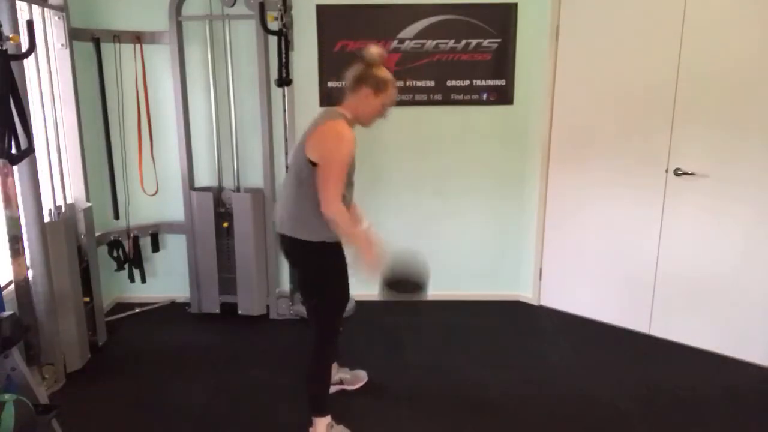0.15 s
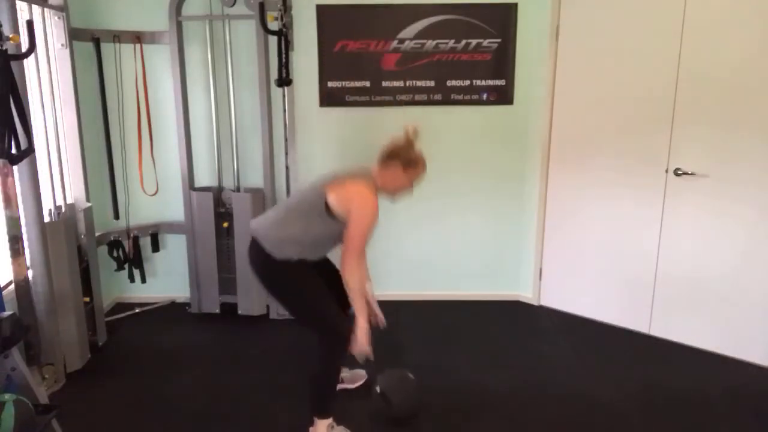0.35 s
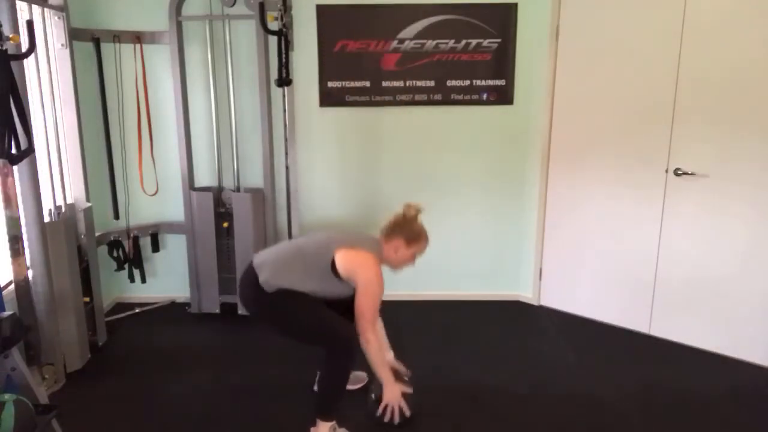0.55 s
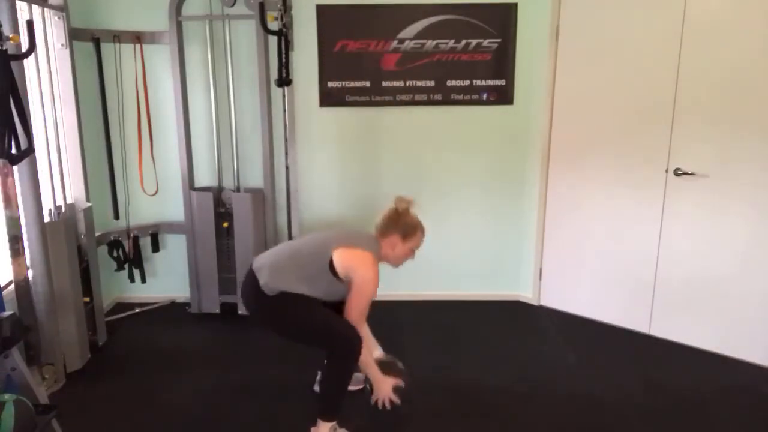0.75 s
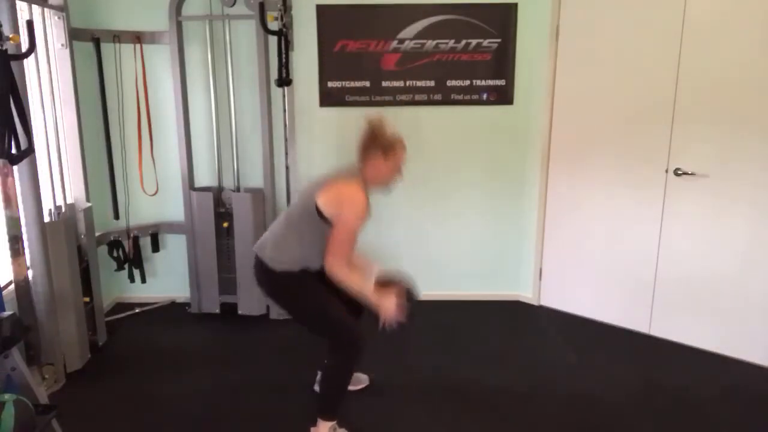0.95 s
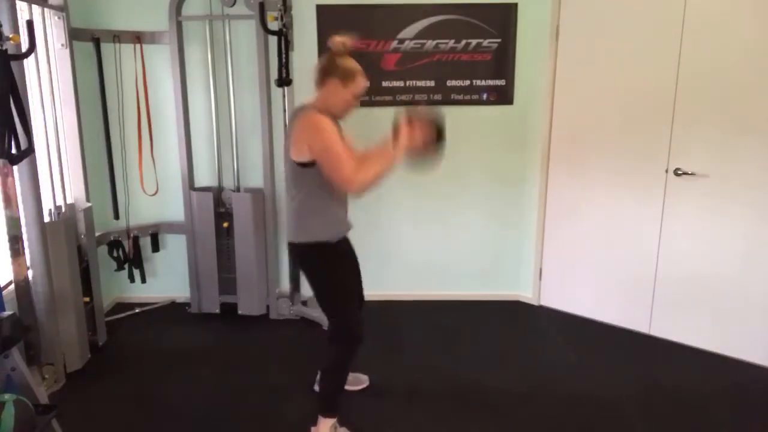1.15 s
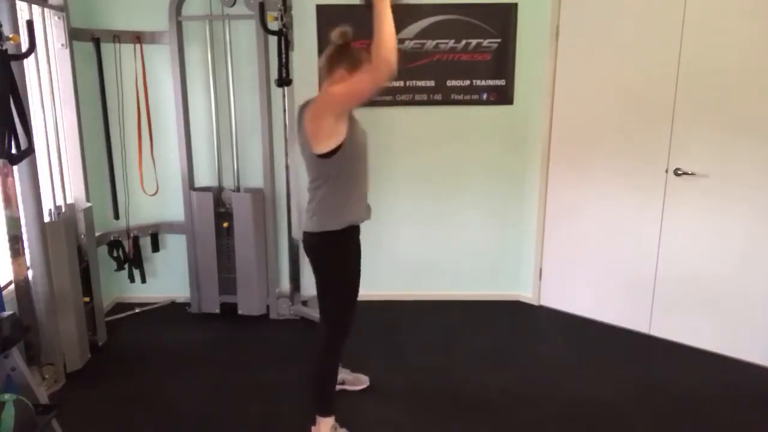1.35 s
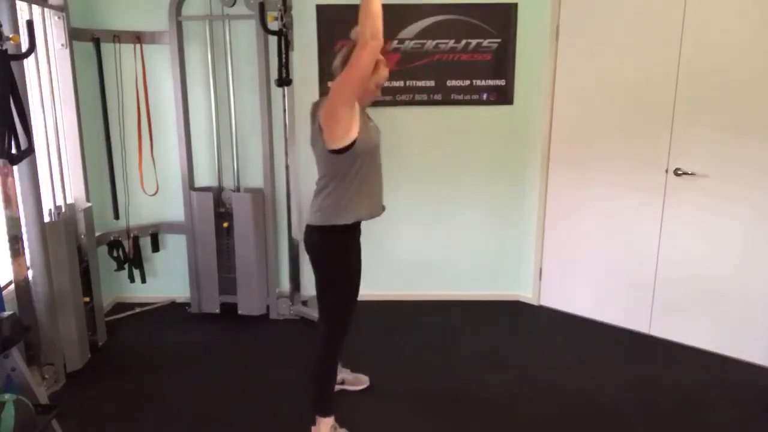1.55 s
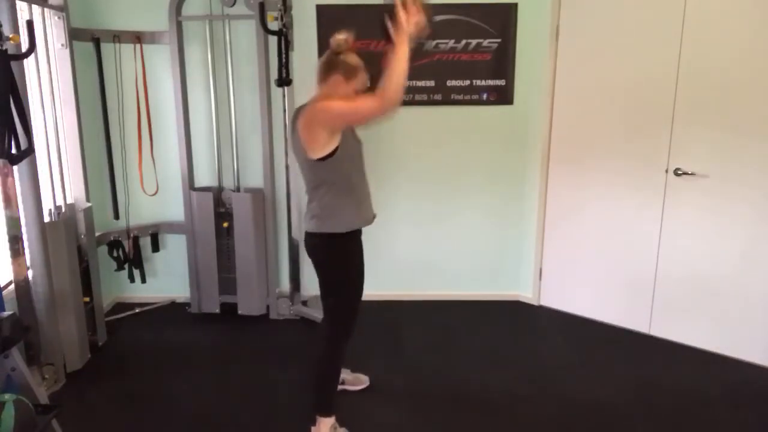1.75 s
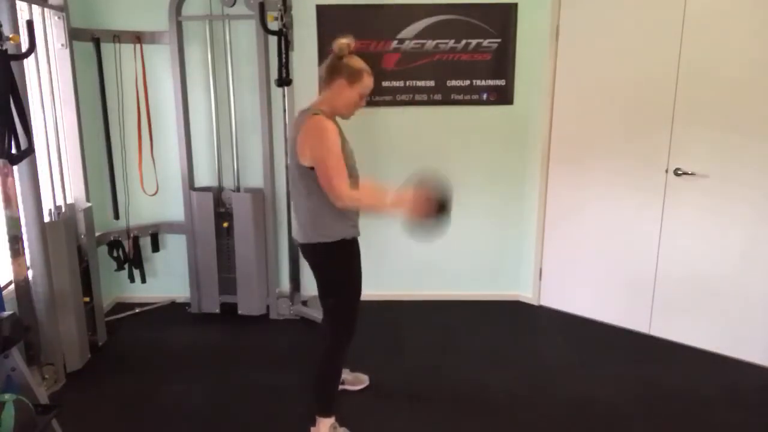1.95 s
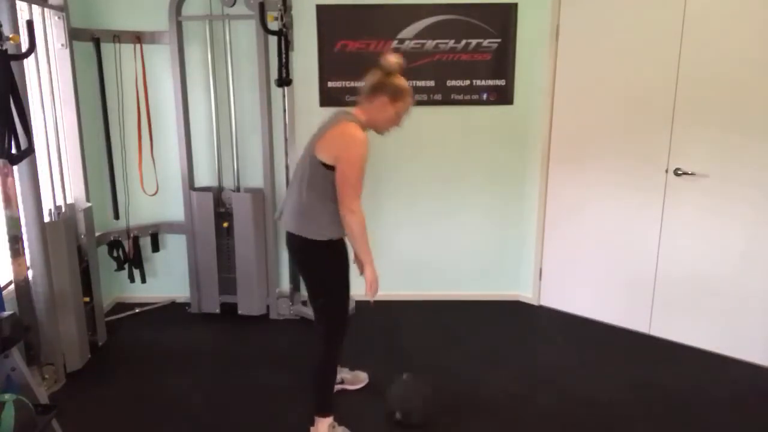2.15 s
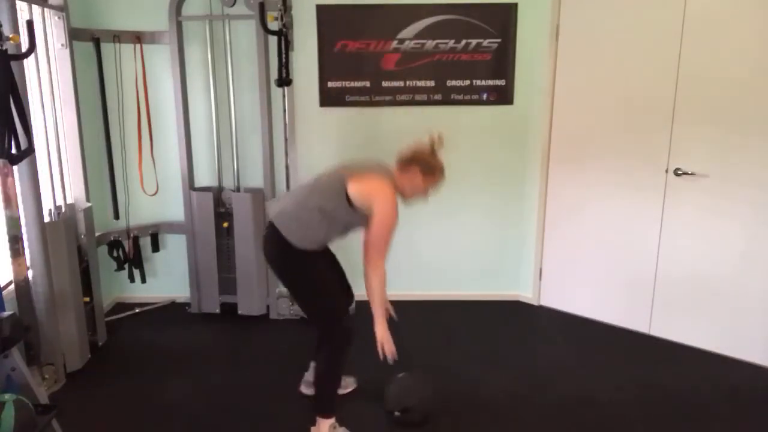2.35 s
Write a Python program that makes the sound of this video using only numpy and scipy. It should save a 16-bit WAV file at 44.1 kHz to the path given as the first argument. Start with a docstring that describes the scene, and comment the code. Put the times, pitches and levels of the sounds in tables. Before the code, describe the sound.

A heavy ball slams onto a matted gym floor at about 0.25 seconds, just after a quick cloth swish: a sharp crack and bright slap, quick wall echoes and a booming half-second tail. A soft padded contact comes near 0.6, a very faint swish near 1.1. Another swish at 2.0 leads to a lower, thuddier slam at 2.12, then a faint pat at 2.35. Low hum and hiss continue throughout.

```python
"""A faint steady hum and hiss, then arms and clothes swish close by: someone slams a heavy rubber ball.
Two throws hit the matted floor of a small, live gym; a fainter swish passes between them.
Each slam sums short damped tones for crack, slap, thump and thud, discrete wall echoes, ringing modes
and decaying noise for the room; shaped noise makes the swishes and the soft contact after each slam."""
import sys
import numpy as np
from scipy import signal
from scipy.fft import rfft, irfft
from scipy.io import wavfile

SR = 44100
rng = np.random.default_rng(int(sys.argv[2]) if len(sys.argv) > 2 else 0)


def wav_out(sig):
    """Save sig, one row per channel (or a flat mono array), as 16-bit PCM at SR to the path in sys.argv[1]."""
    wavfile.write(sys.argv[1], SR, np.round(np.clip(np.atleast_2d(sig).T, -1, 1) * 32767).astype(np.int16))


N = 110250
T = np.arange(N) / SR  # time in seconds


def undb(db):
    """Decibels to amplitude gain."""
    return 10 ** (np.asarray(db) / 20)


def read(table, hz):
    """A table's value, interpolated on a log-frequency axis."""
    table_hz, value = np.array(table, float).T
    return np.interp(np.log(np.maximum(hz, 1)), np.log(table_hz), value)


def noise(colour):
    """Random-phase noise with the given spectrum in dB per Hz, scaled to rms 1."""
    hz = np.fft.rfftfreq(N, 1 / SR)
    random_phase = np.exp(2j * np.pi * rng.random(len(hz)))
    x = irfft(undb(read(colour, hz)) * random_phase, N)
    return x / x.std()


def room_tone():
    """Faint steady hiss of shaped noise over a low hum of pure tones."""
    # Steady hum. Each row: frequency in Hz, rms level in dB.
    hum_tones = [(62, -78.5), (301, -81)]
    # Spectrum of the hiss. Each row: frequency in Hz, relative level in dB per Hz.
    air_colour = [(15, -60.5), (25, -26), (59, -4), (92, -5.5), (130, -5), (266, -6), (301, -5), (492, -10),
                  (530, -8.5), (826, -11), (1350, -14), (5780, -20.5), (9000, -26), (11700, -58.5),
                  (19800, -120)]
    air_db = -68.5
    hum = sum(undb(db) * np.sqrt(2) * np.sin(2 * np.pi * hz * T) for hz, db in hum_tones)
    return undb(air_db) * noise(air_colour) + hum


def fade(t, t60):
    """Exponential decay from t = 0, falling 60 dB in t60 seconds."""
    return (t >= 0) * np.exp(-np.log(1000) * np.maximum(t, 0) / t60)


def swish(at, width, hiss_db, flap_db):
    """Cloth rubs and flaps as the arms swing: noise swells to a peak and the room holds it briefly."""
    # Rubbing cloth. Each row: frequency in Hz, relative level in dB per Hz.
    rub_colour = [(200, -4), (900, -4.5), (1600, -1.5), (3000, 2), (5000, 1.5), (7500, 1), (9000, -4)]
    # Flapping cloth. Each row: frequency in Hz, relative level in dB per Hz.
    flap_colour = [(40, -12), (150, -8), (350, -0.5), (600, -9.5), (1000, -9), (2000, -20), (9000, -41)]
    room_t60_s = 0.45
    t = T - at
    swing = np.exp(-0.5 * (t / width) ** 2)
    swell = np.maximum(swing, fade(t, room_t60_s))
    cloth = undb(hiss_db) * noise(rub_colour) + undb(flap_db) * noise(flap_colour)
    return swell * cloth


def ring(t, hz, t60):
    """One damped vibration: a sine under an exponential decay."""
    return np.sin(2 * np.pi * hz * t) * fade(t, t60)


def modes(t, table):
    """A set of damped vibrations, each delayed by a random part of its own cycle."""
    return sum(undb(db) * ring(t - rng.random() / hz, hz, t60) for hz, db, t60 in table)


def reverberation(t, colour, shade=lambda hz: 0 * hz):
    """Dense reflections as noise: each octave band dies away at its own rate; shade adds dB."""
    # Decay of the gym. Each row: frequency in Hz, t60 in seconds.
    room_t60 = [(60, 0.87), (170, 0.34), (400, .55), (900, 0.56), (2000, 0.6), (4000, 0.54), (8000, 0.41)]
    hz = np.fft.rfftfreq(N, 1 / SR)
    spectrum = rfft(noise(colour)) * undb(shade(hz + 1))
    centres = 62.5 * 2. ** np.arange(8)  # octave centres in Hz
    out = 0
    for centre, pick in zip(centres, np.eye(len(centres))):
        # Neighbouring bands cross-fade and sum to the whole spectrum.
        weight = np.interp(np.log(hz + 1), np.log(centres), pick)
        band = irfft(spectrum * weight, N)
        out = out + band * fade(t, read(room_t60, centre))
    return out


def slam(at, db, slap_hz, slap_db, thump_db, room_db, tilt_db, bump_db, boom_hz, boom_db, thud_db):
    """Skin cracks, trapped air slaps, ball thumps and rings, floor thuds; walls answer, the room booms."""
    # First reflections off the walls. Each row: delay in seconds, gain in dB.
    walls = [(.0055, -15), (.0082, -4), (.0096, -3), (0.0126, -9), (.029, -13.5), (0.045, -11)]
    # Air ringing inside the ball. Each row: frequency in Hz, relative level in dB, t60 in seconds.
    ball_modes = [(1131, -34.5, .45), (1841, -37, .3), (2480, -36, .4), (3086, -45.5, .35),
                  (3398, -42.5, .35), (4165, -39, .3), (4519, -38.5, 0.19), (5626, -46, 0.47),
                  (6810, -49.5, .35)]
    # Ringing of the room. Each row: frequency in Hz, relative level in dB, t60 in seconds.
    room_modes = [(57.4, -45, 0.74), (117, -36, 0.42), (217.7, -35.5, 0.43), (262.3, -32.5, .45),
                  (347, -32, .5), (396.5, -34, .45), (470.6, -36, 0.47), (606.6, -34.5, .5)]
    # Reverberation before tilt and bump. Each row: frequency in Hz, relative level in dB per Hz.
    tail_colour = [(25, -27.5), (50, -10.5), (78, -15.5), (130, -8.5), (220, -3.5), (380, 3.5), (520, -4),
                   (700, -5.5), (1100, -7), (1800, -9.5), (2800, -12.5), (4400, -15.5), (5400, -19.5),
                   (7000, -23.5), (9000, -31)]
    crack_hz, crack_t60_s, crack_db = 3700, 0.0017, -4.5
    slap_t60_s, slap_octaves = 0.0055, 0.1  # the octaves set how narrow the slap's bump in the room is
    thump_hz, thump_t60_s = 385, 0.041
    thud_hz, thud_t60_s = 130, 0.098
    tail_db, early_db, early_t60_s = -22.5, -17.5, 0.1
    clump_s, clump_width_s, clump_db = 0.052, 0.016, 2.5
    build_s, boom_t60_s = 0.004, 0.58

    t = T - at
    crack = -undb(crack_db) * ring(t, crack_hz, crack_t60_s)
    slap = undb(slap_db) * ring(t, slap_hz, slap_t60_s)
    thump = undb(thump_db) * ring(t, thump_hz, thump_t60_s)
    blow = crack + slap + thump
    thud = undb(thud_db) * ring(t, thud_hz, thud_t60_s)
    echoes = sum(undb(gain_db) * np.interp(T - lag, T, blow, left=0) for lag, gain_db in walls)

    def shade(hz):
        """The tail's tilt about the slap's pitch and its bump there, in dB."""
        octaves = np.log2(hz / slap_hz)
        return tilt_db * octaves + bump_db * np.exp(-(octaves / slap_octaves) ** 2)

    tail = reverberation(t, tail_colour, shade)
    tail = tail * (undb(tail_db) + undb(early_db) * fade(t, early_t60_s))
    # Reflections from the far walls arrive together and lift the tail for a moment.
    tail = tail * undb(clump_db * np.exp(-((t - clump_s) / clump_width_s) ** 2))

    # One room mode booms according to where the ball lands.
    boom = undb(boom_db) * ring(t, boom_hz, boom_t60_s)
    ringing = modes(t, ball_modes) + modes(t, room_modes) + boom
    build = 1 - np.exp(-np.maximum(t, 0) / build_s)
    room = undb(room_db) * build * (tail + ringing)
    return undb(db) * (blow + thud + echoes + room)


def touch(at, db, rise):
    """A padded contact with the ball: noise rises softly and decays, with a short tail in the room."""
    # Spectrum of a soft contact. Each row: frequency in Hz, relative level in dB per Hz.
    pat_colour = [(40, -12), (120, 7.5), (300, 5), (700, 2), (1200, 0), (2200, -9.5), (4000, -16.5),
                  (7500, -16.5), (9000, -31.5)]
    pat_t60_s, room_db = 0.13, -1
    t = T - at
    pat = noise(pat_colour) * fade(np.maximum(t - rise, 0), pat_t60_s)
    room = undb(room_db) * reverberation(t, pat_colour)
    return undb(db) * np.clip(t / rise, 0, 1) * (pat + room)


def scene():
    """Two throws in the quiet gym."""
    # Swishes of moving clothes. Each row: peak time in seconds, width in seconds, hiss level in dB,
    # cloth flap level in dB.
    swishes = [(0.139, 0.034, -56, -67.5), (1.09, .06, -73, -80), (2.008, 0.038, -58, -58)]
    # Slams. Each row: start in seconds, level in dB, slap pitch in Hz, slap in dB, thump in dB,
    # room in dB, treble tilt in dB per octave, slap in the room in dB, boom pitch in Hz, boom in dB,
    # floor thud in dB. The slam's level scales all its parts; the room's also scales the boom.
    slams = [(0.2483, -1.5, 1380, -3.5, -19.5, 1.28, -0.28, 2.5, 416, -32.5, -33.5),
             (2.1198, -1, 1040, -12, -18, 0.05, 0.04, 6, 293, -29.5, -27.5)]
    # Soft contacts of ball and hands. Each row: start in seconds, level in dB, rise in seconds.
    touches = [(0.597, -51, 0.021), (2.355, -52.5, .028)]
    out = room_tone()
    out = out + sum(swish(*row) for row in swishes)
    out = out + sum(slam(*row) for row in slams)
    out = out + sum(touch(*row) for row in touches)
    return out[None]


def record(dry):
    """The recorder thins the deep bass, rounds the highest peaks and cuts the top."""
    low_cut_hz, top_hz, ceiling = 35, 8900, 0.75
    thin = signal.sosfilt(signal.butter(2, low_cut_hz, "high", fs=SR, output="sos"), dry)
    rounded = ceiling * np.tanh(thin / ceiling)
    return signal.sosfilt(signal.ellip(10, 0.2, 70, top_hz, fs=SR, output="sos"), rounded)


dry = scene()
out = record(dry)
wav_out(out)
```